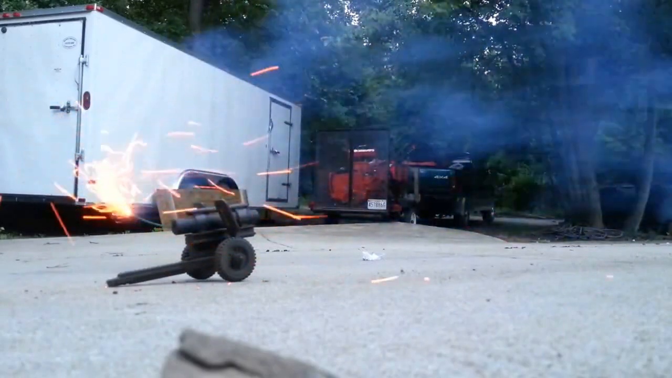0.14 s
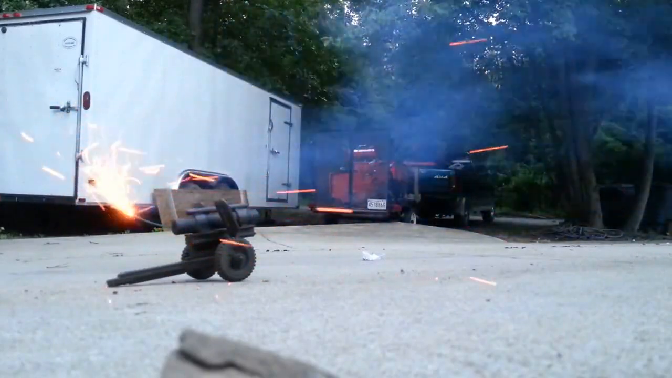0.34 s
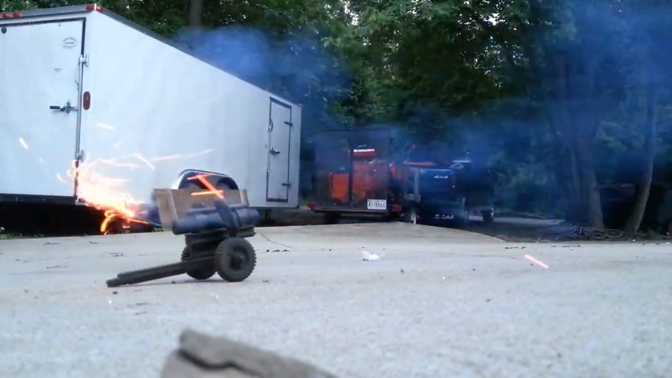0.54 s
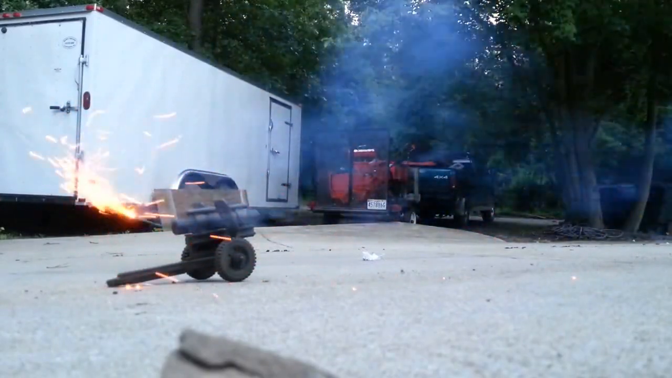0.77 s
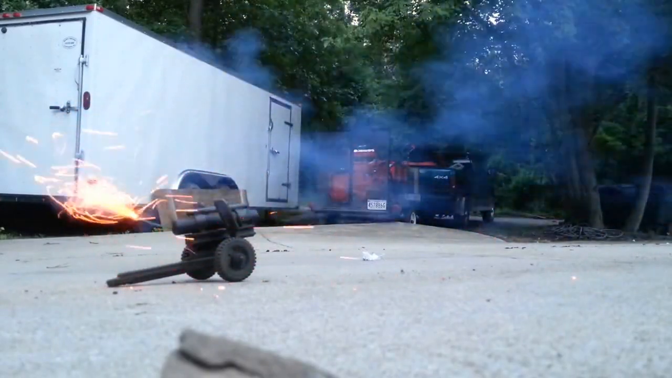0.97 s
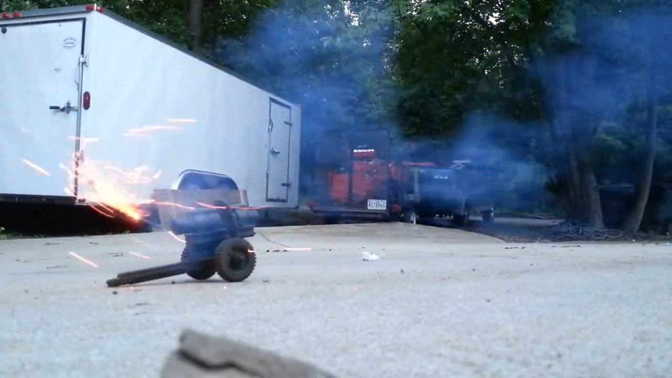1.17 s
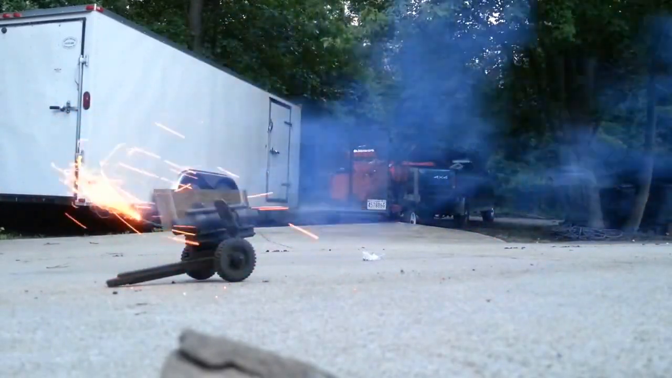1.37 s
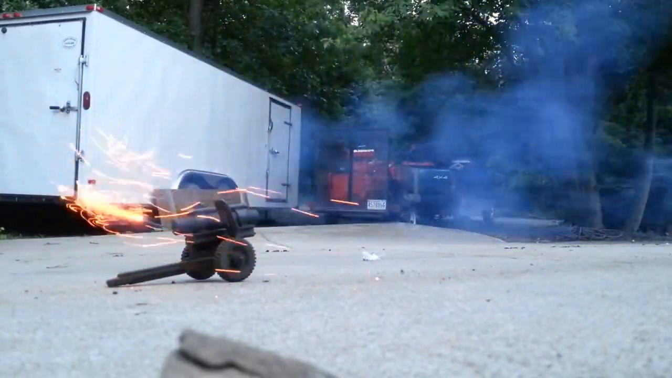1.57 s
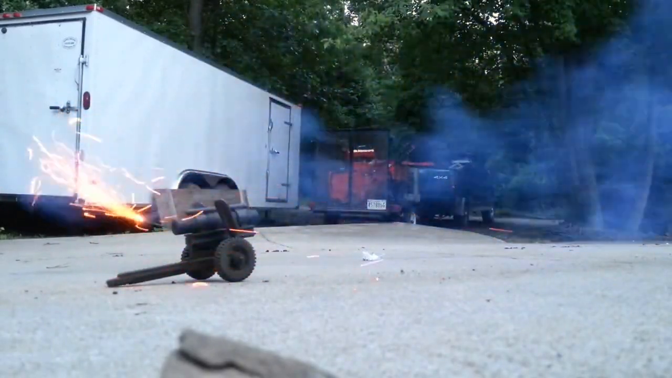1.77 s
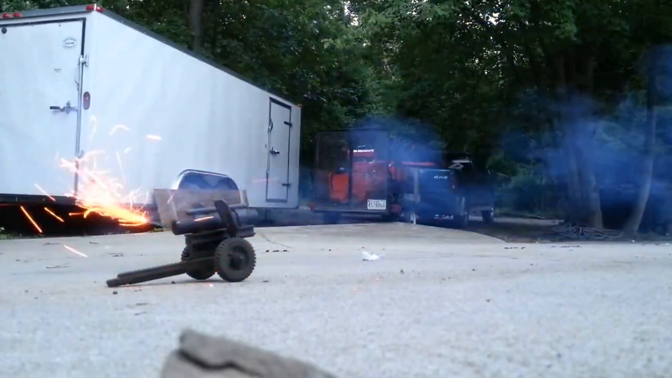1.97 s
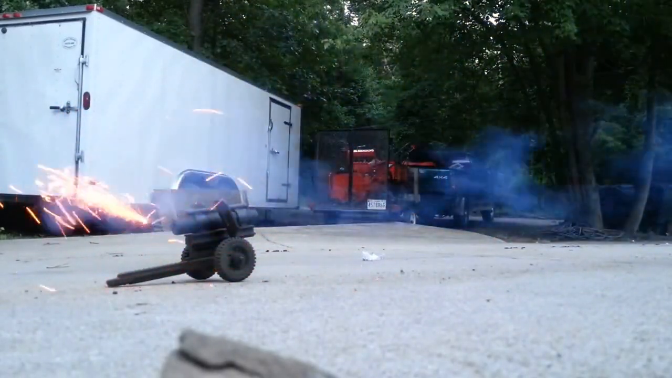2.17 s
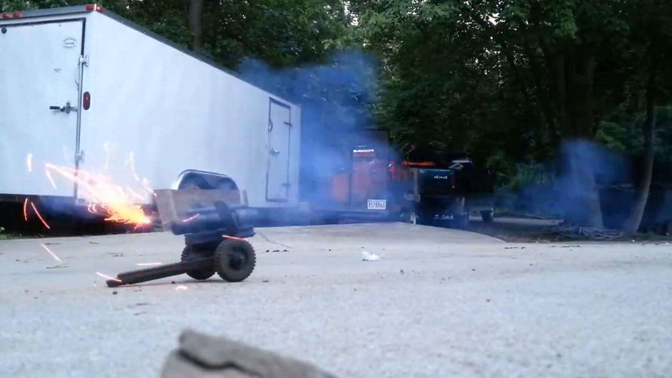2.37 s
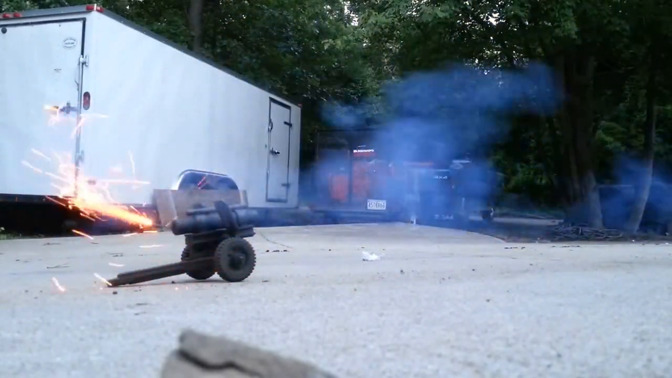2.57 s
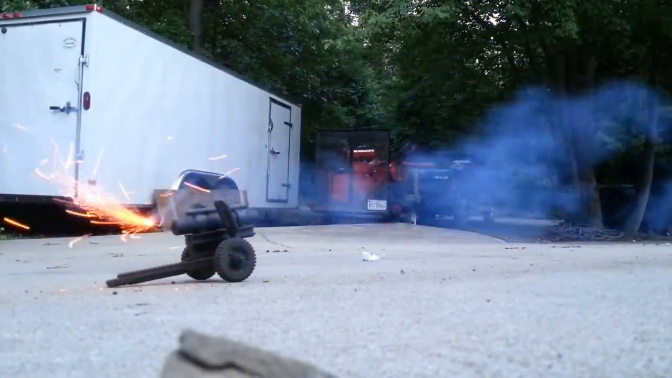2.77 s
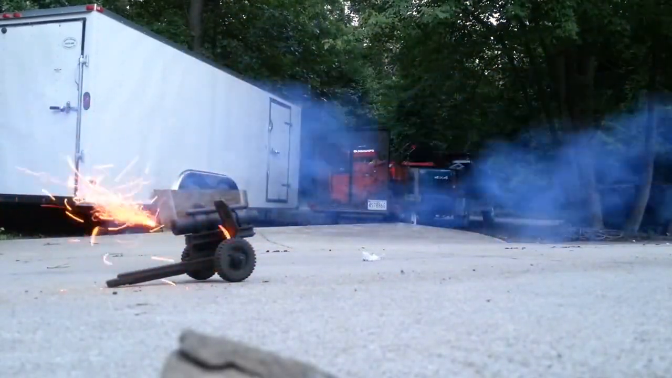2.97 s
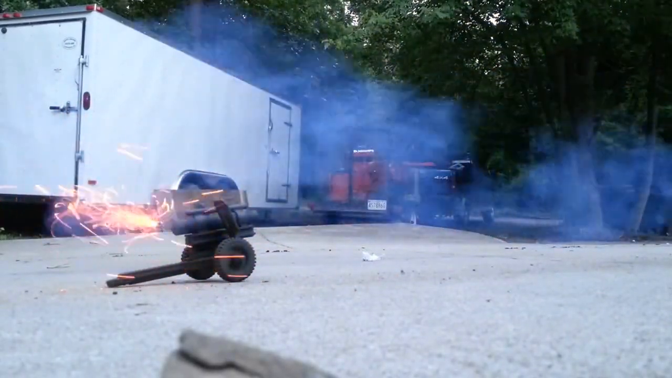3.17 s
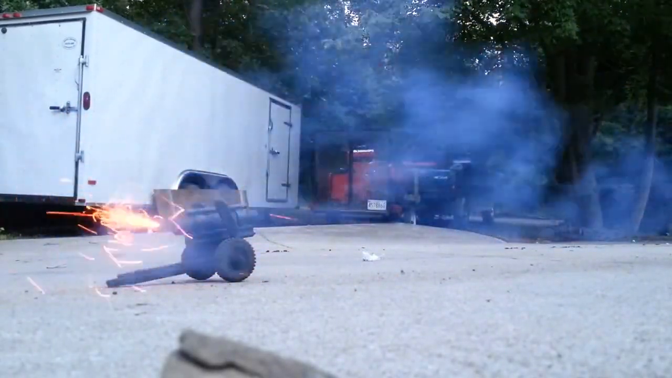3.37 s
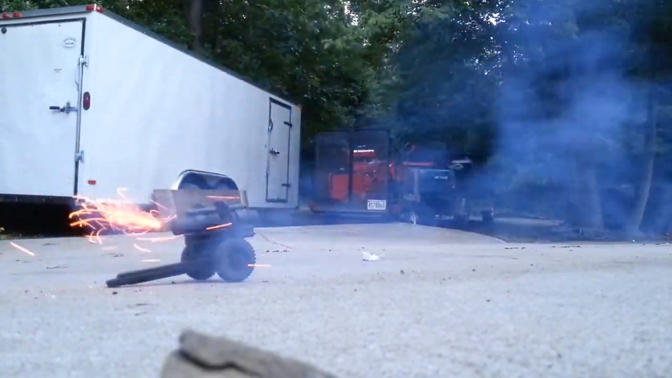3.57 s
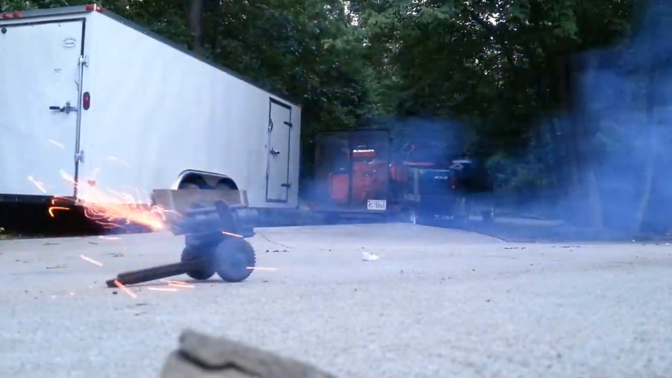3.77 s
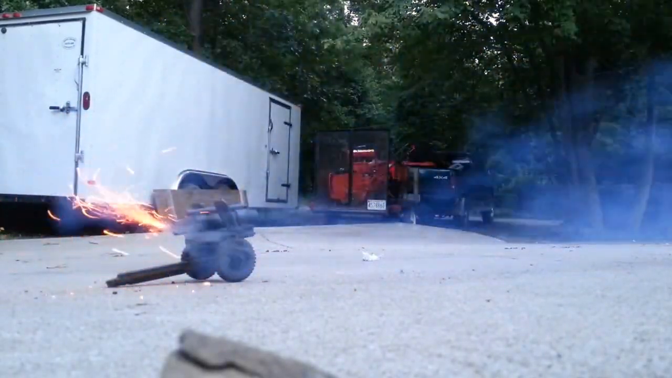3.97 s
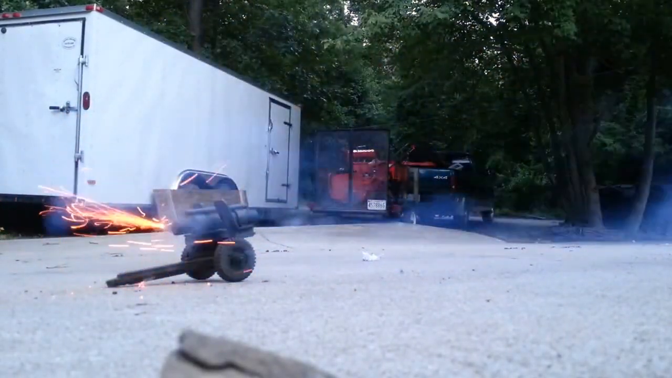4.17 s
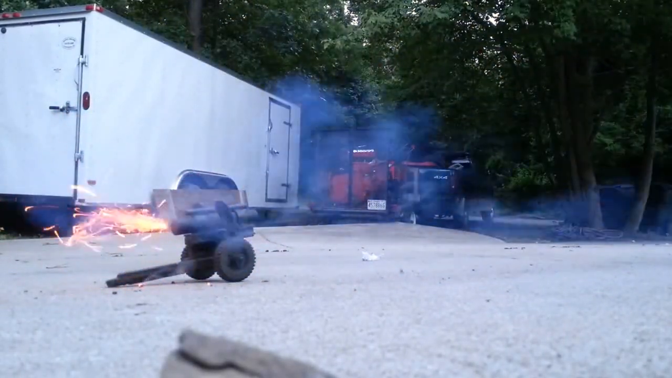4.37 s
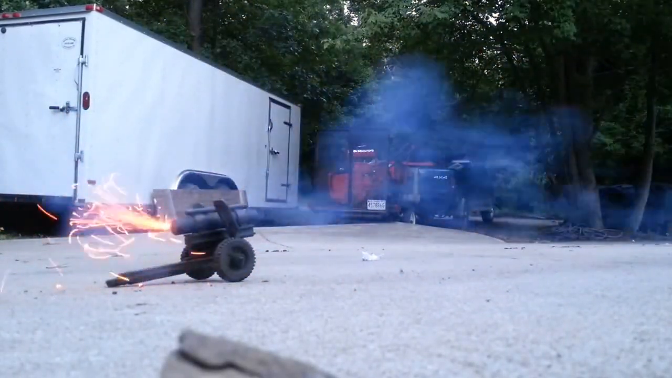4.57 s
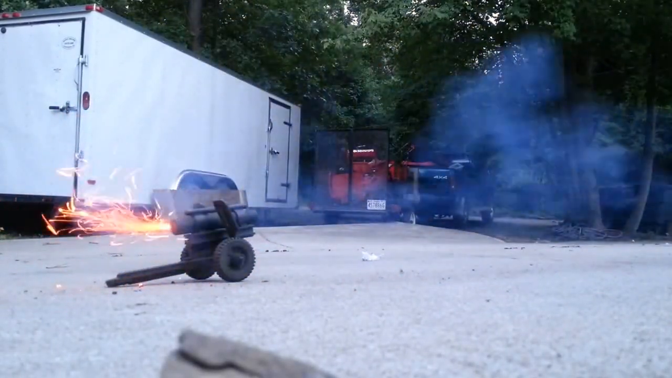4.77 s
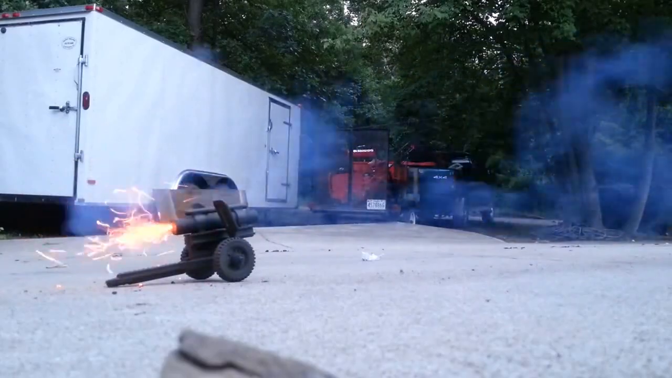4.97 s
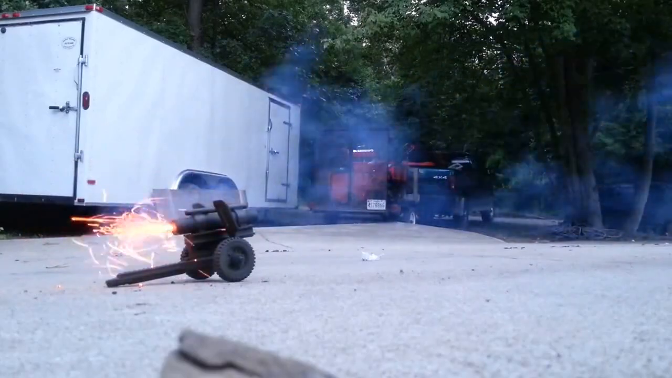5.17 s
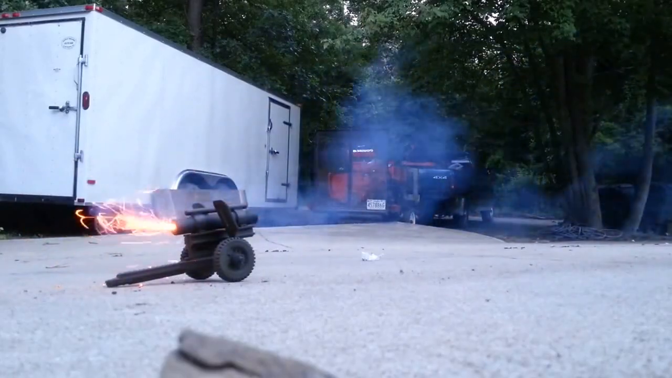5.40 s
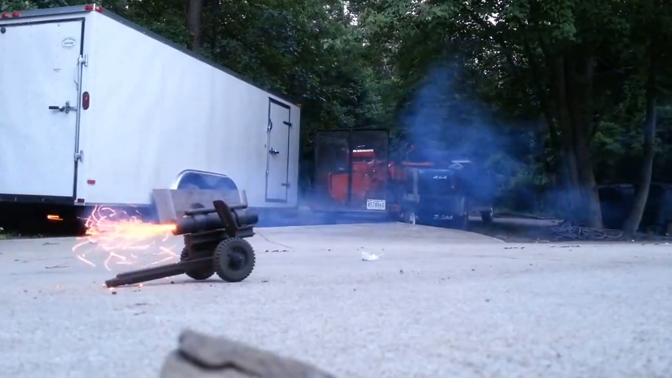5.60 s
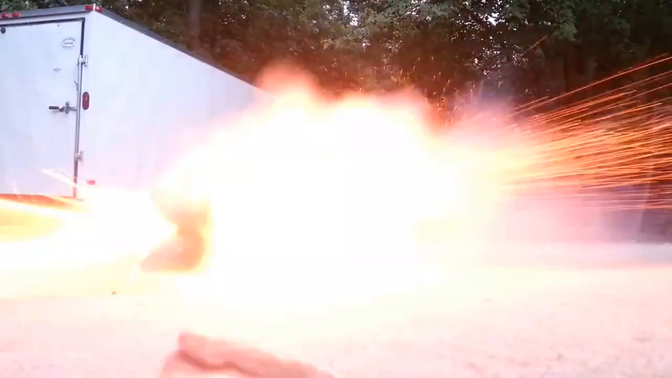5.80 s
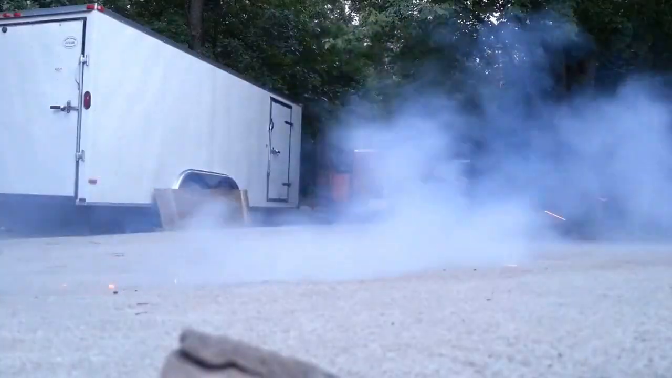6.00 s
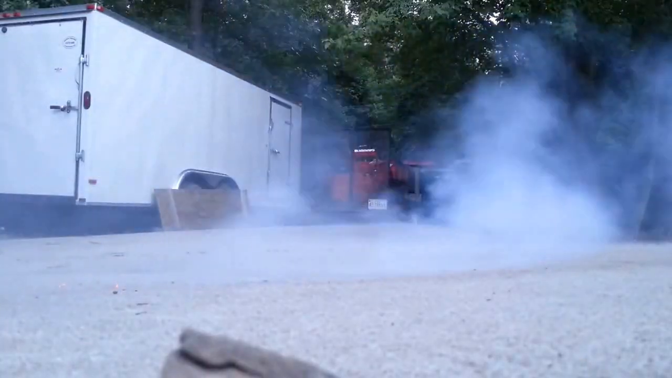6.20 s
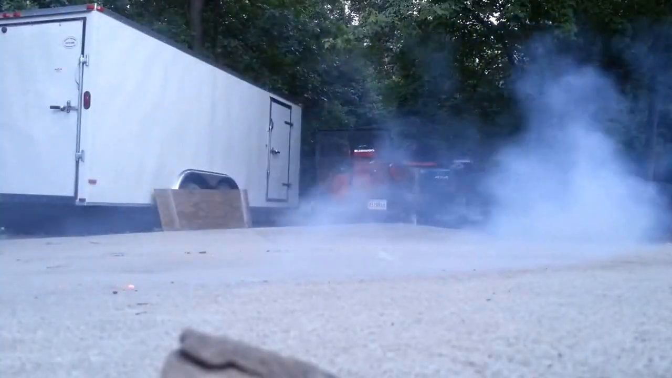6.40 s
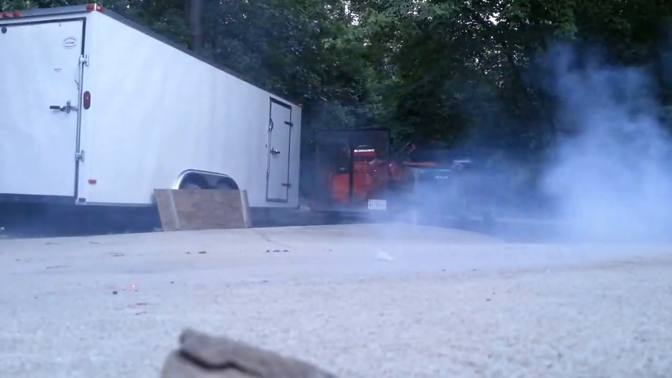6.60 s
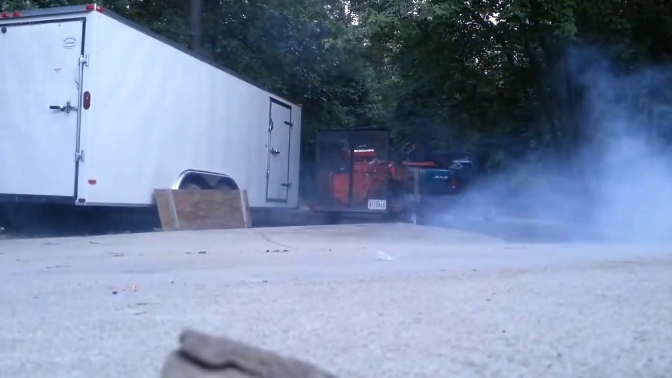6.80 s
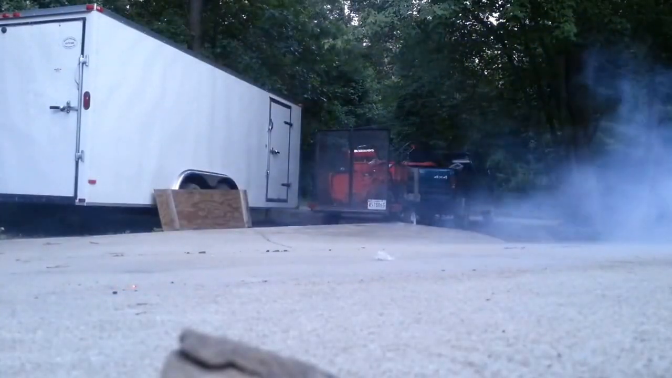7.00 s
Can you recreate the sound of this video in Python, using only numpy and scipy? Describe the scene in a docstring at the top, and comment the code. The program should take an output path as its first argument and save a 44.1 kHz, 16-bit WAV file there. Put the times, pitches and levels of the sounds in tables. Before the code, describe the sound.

Outdoors in a gravel yard surrounded by trees, with close stereo microphones. From 0 to 5.77 s a fuse burns with a continuous bright, sputtering hiss, its level fluttering quickly and its treble growing crisper toward the end. Far traffic rumbles very faintly underneath, and at about 3 to 4.8 s a distant engine drones by, gliding down in pitch, barely audible. From about 4.8 s, low wind buffets thump on the microphones, with a brief pop at 5.1 s. At 5.77 s the hiss swells into a flash of roar and at 5.8 s a small cannon fires: one huge, sharp, clipped bang with a heavy boom. Lumpy echoes come back from trees and walls, losing treble and fading until 7 s, with a thuddy slap near 6.3 s. Grit lands with dry, short, ringing clicks at about 5.95, 6.3 and 6.37 s, and a louder, clattering cluster at 6.72 to 6.75 s toward the left.

```python
"""Gravel yard ringed by trees: a fuse burns down to the vent of a small cannon.
Far traffic, a passing drone, hiss and port wind are filtered noise and a gliding sine; the fuse is
a sputtering noise jet. The vent flare and ever duller echoes are lumpy noise, the muzzle blast N-shaped
pulses that overload the microphones, the landing grit noise cracks with short ringing modes."""
import sys
import numpy as np
from scipy import signal
from scipy.fft import rfft, irfft
from scipy.io import wavfile
from scipy.ndimage import map_coordinates

SR = 44100
rng = np.random.default_rng(int(sys.argv[2]) if len(sys.argv) > 2 else 0)


def transcribe(u):
    """Save the signal u as a 16-bit wav file named by the first command-line argument.

    u: samples, shape (n,) or (channels, n), limited to [-1, 1]; the rate is SR.
    q: integer samples, one column per channel.
    """
    v = np.clip(np.atleast_2d(u).T, -1, 1)
    q = np.round(v * 32767).astype(np.int16)
    wavfile.write(sys.argv[1], SR, q)


N = 310905
T_S = np.arange(N) / SR
HZ = np.maximum(np.arange(N // 2 + 1) * SR / N, 1)


def from_db(db):
    """Amplitude gain of a level in dB."""
    return 10 ** (np.asarray(db) / 20)


def rms_one(x):
    """Scale to rms 1."""
    return x / np.sqrt(np.mean(x ** 2) + 1e-20)


def in_time(rows):
    """Columns of a time table, interpolated to one value a sample."""
    s, *columns = np.transpose(rows)
    return [np.interp(T_S, s, column) for column in columns]


def at_hz(rows, hz=HZ):
    """Columns of a spectrum table, interpolated over log frequency."""
    f, *columns = np.transpose(rows)
    return [np.interp(np.log(hz), np.log(f), column) for column in columns]


def drift(rate_hz):
    """Slow random signal of spread 1: noise through two equal poles at rate_hz."""
    step = 40  # samples between slow values
    r = np.exp(-2 * np.pi * rate_hz * step / SR)
    white = rng.standard_normal(N // step + 2002)
    slow = signal.lfilter([1], [1, -2 * r, r * r], white)[2000:]  # drop the run-in
    return np.interp(np.arange(N) / step, np.arange(len(slow)), rms_one(slow))


def ring(clicks, hz, t60_s):
    """Two-pole resonator: a unit click starts a decaying sine of height 1."""
    r, w = from_db(-60 / (t60_s * SR)), 2 * np.pi * hz / SR
    return signal.lfilter([0, np.sin(w)], [1, -2 * r * np.cos(w), r * r], clicks + 1e-18)


def noise_pair(left_db, right_db, alike, lead_rad=0):
    """Left and right noise spectra of given colour, likeness and left phase lead; joint rms 1."""
    mid, side = rfft(rng.standard_normal((2, N)))
    alike = np.clip(alike, 0, 1)
    shared, own = np.sqrt(1 + alike) * mid, np.sqrt(1 - alike) * side
    left = shared + own
    right = (shared - own) * np.exp(-1j * lead_rad)
    pair = np.array([left * from_db(left_db), right * from_db(right_db)])
    return pair * N / np.sqrt(np.sum(np.abs(pair) ** 2))


def bands(pair, centres_hz):
    """Split a pair into overlapping bands that add up to the whole."""
    for k, hz in enumerate(centres_hz):
        share = np.interp(np.log(HZ), np.log(centres_hz), np.arange(len(centres_hz)) == k)
        yield hz, irfft(pair * share, N)


# far traffic rumble: [t/s, level/dB]
RUMBLE_LEVEL = [(0, -45), (1.0, -44), (1.7, -49), (2.3, -44), (3.2, -47), (4.2, -43.5), (5.0, -48),
                (7.05, -45)]
# rumble spectrum, relative: [f/Hz, density/dB per Hz]
RUMBLE_COLOUR = [(18, -56), (30, -35), (54, -32), (75, -6), (130, -1.5), (211, 0), (250, -5.5),
                 (613, -13.5), (900, -14), (1170, -29), (1980, -120)]
# far engine droning past: [t/s, f/Hz, level/dB]
DRONE_GLIDE = [(2.9, 156, -80), (3.3, 150, -48), (3.8, 135, -46), (4.3, 122, -46), (4.5, 118, -52),
               (4.9, 112, -80)]
# yard hiss spectrum, relative: [f/Hz, density/dB per Hz]
HISS_COLOUR = [(500, 7), (1300, 0), (2200, -25), (5000, -2), (15000, -6.5)]
HISS_DB = -55


def surroundings():
    """Far traffic as near-mono low noise, an engine as a wavering gliding sine, faint wide hiss."""
    rumble_db, hiss_db = at_hz(RUMBLE_COLOUR)[0], at_hz(HISS_COLOUR)[0]
    rumble = from_db(in_time(RUMBLE_LEVEL)[0]) * irfft(noise_pair(rumble_db, rumble_db, 0.95), N)
    drone_hz, drone_db = in_time(DRONE_GLIDE)
    drone = from_db(drone_db + 1.3 * drift(5.3)) * np.sin(2 * np.pi * np.cumsum(drone_hz) / SR)
    hiss = from_db(HISS_DB) * irfft(noise_pair(hiss_db, hiss_db, 0.14), N)
    return rumble + drone + hiss


# wind spectrum, relative: [f/Hz, density/dB per Hz]
WIND_COLOUR = [(20, -22), (50, -3.5), (120, 3), (200, 0), (320, -14), (600, -47)]
# wind on both ports, before lumps: [t/s, level/dB]
BREEZE_LEVEL = [(0, -62.5), (4.6, -55), (4.84, -43), (5.5, -43), (6.4, -47), (6.7, -40), (7.05, -39.5)]
# buffets on one port, before lumps: [t/s, peak/dB, 1/e half length/s, port]
PORT_BUFFETS = [(4.908, -41, 0.026, "left"), (4.97, -38, .06, "right"), (5.066, -33, 0.022, "left"),
                (5.192, -33, 0.04, "right"), (5.29, -29, 0.052, "left"), (5.34, -32.5, 0.037, "right"),
                (5.43, -36, 0.054, "right"), (5.662, -30, 0.02, "left"), (5.71, -50, 0.037, "right"),
                (6.553, -37, 0.031, "left"), (6.603, -40, .06, "right"), (6.77, -39, .04, "right"),
                (6.83, -39, 0.03, "right"), (6.914, -32.5, 0.021, "left"), (7.03, -39, .015, "left")]
# swirl popping on the left port: [t/s, peak/dB, length/s]
SWIRL_POP = (5.1155, -14, .0045)


def buffet_gain(side):
    """Sum of bell-shaped swells on one port."""
    return sum(from_db(peak_db) * np.exp(-((T_S - s) / half_s) ** 2)
               for s, peak_db, half_s, port in PORT_BUFFETS if port == side)


def wind():
    """Lumpy low noise own to each port, swelling in buffets; one pop is a single push and pull."""
    colour_db = at_hz(WIND_COLOUR)[0]
    lumps = from_db(0.97 * np.array([drift(10.0), drift(18)]))
    buffets = np.array([buffet_gain("left"), buffet_gain("right")])
    strength = from_db(in_time(BREEZE_LEVEL)) + buffets
    gusts = strength * lumps * irfft(noise_pair(colour_db, colour_db, 0), N)
    pop_s, peak_db, length_s = SWIRL_POP
    cycle = np.clip((T_S - pop_s) / length_s, 0, 1)
    gusts[0] += from_db(peak_db) * np.sin(2 * np.pi * cycle)
    return gusts


# grit landings: [t/s, reference peak/dB, left-right/dB, skid/s, favoured ring f/Hz]
LANDINGS = [(5.9543, -10, -1.5, 0, 7200), (6.3022, -13.5, 4, .0015, 3600), (6.3660, -19.5, 3, 0, 3600),
            (6.3712, -23, 3, 0, 3600), (6.5282, -36, 0, 0, 7900), (6.7192, -12.5, 7, .007, 3300),
            (6.7362, -24, 7, 0, 2950), (6.7376, -7, 9, 0, 2800), (6.7425, -25, 7, 0, 2950),
            (6.7441, -12, 7, 0, 2950), (6.7488, -21, 6, 0, 2950), (6.7528, -20, 6, 0, 2950)]
# spacing of a skidding grain's touches, loss per touch
SKID_TOUCH_S, SKID_LOSS_DB = .0015, 1.5


def touches():
    """Landings plus the weakening, unevenly spaced touches of grains that skid."""
    uneven = rng.uniform(-.3, .3, (len(LANDINGS), 8))
    rows = []
    for row, (s, peak_db, pan_db, skid_s, ring_hz) in enumerate(LANDINGS):
        for k in range(8):
            if k * SKID_TOUCH_S <= skid_s:
                at_s = s + SKID_TOUCH_S * (k + (k > 0) * uneven[row, k])
                rows.append((at_s, peak_db - SKID_LOSS_DB * k, pan_db, ring_hz))
    return rows


# ringing modes, level relative to the touch: [f/Hz, level/dB, t60/s]
RING_MODES = [(2500, -12, .008), (2950, -8, .007), (3600, -8, .007), (4400, -13, .004), (5800, -9, .005),
              (6800, -8, .006), (7900, -12, .005)]
# crack spectrum, relative: [f/Hz, density/dB per Hz]
CRACK_SPECTRUM = [(1200, -21), (2500, 11), (7500, -17), (9300, -19), (11500, -13), (15000, -12)]
CRACK_DB, CRACK_T60_S = -10.5, 0.008
FAVOUR_DB, FAVOUR_OCTAVES = 7, .17  # boost of modes near the favoured pitch over far ones; width
GRIT_RIGHT_LATE_S = .00032  # grit lands to the left


def grit():
    """Each touch is a dry broad crack and strikes shared short modes with strengths of its own."""
    s, peak_db, pan_db, favoured_hz = np.transpose(touches())
    at = (s * SR).astype(int)
    sides_db = peak_db + np.outer([.5, -.5], pan_db)
    spread_db = rng.normal(0, 0.81, (len(s), len(RING_MODES)))
    hits = np.zeros((2, N))
    hits[:, at] = from_db(sides_db + CRACK_DB)
    dying = signal.lfilter([1], [1, -from_db(-60 / (CRACK_T60_S * SR))], hits + 1e-18)
    colour_db = at_hz(CRACK_SPECTRUM)[0]
    out = dying * irfft(noise_pair(colour_db, colour_db, 0.25), N)
    for k, (hz, level_db, t60_s) in enumerate(RING_MODES):
        near = np.exp(-(np.log2(hz / favoured_hz) / FAVOUR_OCTAVES) ** 2) - .5
        mode_db = sides_db + level_db + FAVOUR_DB * near + spread_db[:, k]
        hits[:, at] = from_db(mode_db) * (-1) ** k  # neighbouring modes start opposed
        out += ring(hits, hz, t60_s)
    return np.array([out[0], np.roll(out[1], int(GRIT_RIGHT_LATE_S * SR))])


# fuse jet, bright core before JET_GAIN_DB and random swings: [t/s, level/dB]
FUSE_LEVEL = [(0.0, -34.5), (0.11, -34), (0.24, -32.5), (0.27, -34.5), (0.56, -36), (0.91, -30.5),
              (0.99, -35.5), (1.36, -33), (1.39, -34.5), (1.44, -31.5), (1.51, -36.5), (1.59, -29),
              (1.67, -36.5), (1.76, -31), (1.82, -35.5), (3.0, -33), (3.13, -32.5), (3.3, -37),
              (3.48, -33.5), (3.62, -36.5), (3.72, -33), (3.79, -37), (3.95, -31.5), (3.96, -34.5),
              (4.2, -33), (4.27, -39), (4.33, -32.5), (4.4, -32.5), (4.43, -34.5), (4.75, -34.5),
              (4.8, -32), (4.83, -34.5), (5.2, -33), (5.28, -37), (5.5, -34.5), (5.76, -34)]
# jet treble and its ground echo: [t/s, treble over jet/dB, notch f/Hz, echo share/0-1]
FUSE_TREBLE = [(0, -9.5, 9700, 0.9), (1.4, -6, 11000, 0.5), (1.7, -3, 12400, 0.54), (2.6, -2.5, 12800, 0),
               (3.6, -1.5, 12500, 0), (4.3, -2.5, 13890, 0.33), (5.0, 3.5, 14400, 0.03),
               (5.77, 6, 14330, 0)]
# jet spectrum, relative: [f/Hz, left/dB per Hz, right/dB per Hz, likeness/0-1, left lead/rad]
JET_COLOUR = [(60, -27.5, -36, .7, .05), (185, -9.5, -9.5, 0.68, .2), (490, -5.5, -6.5, 0.97, 0.8),
              (976, -4, -4.5, 0.89, 1.35), (1650, -6, -7.5, 0.67, 1.61), (2670, -2, -3.5, 0.89, 2.51),
              (2866, -4.5, -4.5, 0.99, 2.72), (3370, -5.5, -7, 1, 3.5), (3555, -2.5, -4, .9, 3.66),
              (4180, -1.5, -5.5, 0.61, 3.5), (5730, -4, -9.5, 1, 5.47), (7300, 0.5, -14.5, 0.4, 5.8),
              (8180, -2, -12.5, 0.9, 6.7), (10250, -11, -15, 0, 8), (12500, -5.5, -11, 0.3, 9.3),
              (14800, -15.5, -13, 0.2, 11.4)]
# burning point wanders, mostly toward the middle, then back a little:
# [t/s, right-port lag/samples, 1 is taken off]
WANDER_LAG = [(0, 1.7), (2.5, 1.25), (4.5, 0.47), (5.77, 0.9)]
FUSE_OUT_S = 5.772  # swallowed by the vent
JET_GAIN_DB, SURGE_DB = 6, 0.5  # whole jet over its core; random surges
LOWS_FOLLOW, LOWS_EDGE_HZ, TREBLE_EDGE_HZ = 0.3, 2000, 9300  # lows take only this share of swings
FLICKER_SAMPLES = 0.21  # the flame dances: port lag wavers


def fuse():
    """A sputtering gas jet; its treble meets a ground echo whose notch mostly climbs as the flame sinks."""
    level_db, = in_time(FUSE_LEVEL)
    treble_db, notch_hz, echo = in_time(FUSE_TREBLE)
    swing_db = level_db - level_db.mean() + 0.45 * drift(24) + SURGE_DB * drift(19.0)
    body, treble = 0, 0
    for hz, band in bands(noise_pair(*at_hz(JET_COLOUR)), [300, 700, 1500, 3000, 6000, 8800, 9800, 13000]):
        follows = LOWS_FOLLOW if hz < LOWS_EDGE_HZ else 1
        band = band * from_db(follows * swing_db + 1.27 * drift(26))
        if hz > TREBLE_EDGE_HZ:
            treble = treble + band
        else:
            body = body + band
    echo_at = np.arange(N) - 1.5 * SR / notch_hz  # 1.5 periods late: cancels at notch_hz
    echoed = np.array([map_coordinates(side, [echo_at], order=3) for side in treble])
    treble = from_db(treble_db) * (treble + np.clip(echo, 0, 1) * echoed)
    burning = np.arange(N) < FUSE_OUT_S * SR
    jet = burning * from_db(level_db.mean() + JET_GAIN_DB) * (body + treble)
    right_at = np.arange(N) + 1 - in_time(WANDER_LAG)[0] + FLICKER_SAMPLES * drift(12.0)
    return np.array([jet[0], map_coordinates(jet[1], [right_at], order=3)])


# the muzzle points right: flare, echo envelope reach the left port later
LEFT_LATE_S = 0.0012
# roar spectrum, relative: [f/Hz, density/dB per Hz]
ROAR_SPECTRUM = [(40, -25), (100, -20), (180, -8.5), (280, -0.5), (450, 3), (800, -2.5), (1500, -6),
                 (3000, -10), (7500, -15.5), (10000, -19), (13000, -23.5), (15000, -26)]
# left-right likeness of the roar: [f/Hz, likeness/0-1]
ROAR_ALIKE = [(60, .4), (130, 0.82), (250, 0.99), (640, 0.51), (1400, 0.01), (15000, 0.0088)]
# treble lost on the way, below zero where the sound is bright (vent flare, early echoes):
# [t/s, loss at 1 kHz/dB]
TREBLE_LOSS = [(5.766, -3), (5.797, -1.9), (5.804, 0.17), (5.92, -0.45), (6.1, 1.34), (6.3, 3.5), (6.42, 4),
               (6.55, 5), (6.8, 6), (7.05, 6)]
# second spit of flame after the snuffing: [t/s, level/dB]
SECOND_SPIT = [(5.8008, -12), (5.8013, 3), (5.8022, 1), (5.803, -15)]
# echoes from trees and walls: [t/s, level/dB, boom of far walls over it/dB]
ECHO_LEVEL = [(5.81, 0, 9), (5.845, 5, -4.5), (5.866, -3, 3.5), (5.88, -1.5, 7), (5.9, -7.5, 1),
              (5.94, -8.5, 2), (5.97, -10, -0.5), (6.0, -9, 0), (6.03, -9, -2.5), (6.07, -8, 1),
              (6.095, -8, 2.5), (6.13, -9.5, 1), (6.17, -11, -3), (6.205, -9.5, 2.5), (6.25, -11, -0.5),
              (6.29, -11.5, -6), (6.35, -15, -1), (6.42, -18.5, 0), (6.47, -19.5, -1), (6.54, -20.5, 2),
              (6.6, -22, -1.5), (6.65, -24.5, 2), (6.7, -24, 1), (6.77, -24.5, -1.5), (6.85, -28, -0.5),
              (7.05, -34.5, -2.5)]
# the flare swells steadily, is snuffed within SWITCH_S, then dies on until the first echoes
FLARE_START_S, FLARE_END_S, FLARE_START_DB, FLARE_END_DB = 5.766, 5.7965, -43, 20
SNUFFED_DB, LULL_DB, LULL_END_S, SWITCH_S = -10, -19, 5.809, .0012
BOOM_EDGE_HZ, BRIGHT_PEAK_HZ = 400, 7500  # boom lies below; brightness stops rising above
LOSS_POWER = 0.88  # loss grows a little slower than frequency
ECHO_LEFT_LATE_S, ECHO_LEFT_TREBLE_DB = .00017, 2  # echoes come a little from the right; left brighter


def roar():
    """Vent flare and echoes from trees and walls: lumpy noise losing treble with distance travelled."""
    flare = [(FLARE_START_S, FLARE_START_DB), (FLARE_END_S, FLARE_END_DB),
             (FLARE_END_S + SWITCH_S, SNUFFED_DB), *SECOND_SPIT, (LULL_END_S, LULL_DB)]
    level_db, boom_db = in_time([(s, db, 0) for s, db in flare] + list(ECHO_LEVEL))
    loss_db, = in_time(TREBLE_LOSS)
    colour_db, alike = at_hz(ROAR_SPECTRUM)[0], at_hz(ROAR_ALIKE)[0]
    level_db = np.array([np.roll(level_db, int(LEFT_LATE_S * SR)), level_db])
    left_db = colour_db + 0.62 + ECHO_LEFT_TREBLE_DB * np.clip(HZ / 8000, 0, 1) ** 2
    pair = noise_pair(left_db, colour_db - .6, alike, -2 * np.pi * HZ * ECHO_LEFT_LATE_S)
    out, lumps = 0, drift(30)
    for hz, band in bands(pair, [100, 200, 320, 520, 1000, 1700, 2600, 4000, 6000, 9000, 13000]):
        # single trunks and walls make the bass lumpy, leaves scatter the treble smooth
        lumpy_db = (1.0 * lumps + 1.4 * drift(21)) / (1 + hz / 1500)
        reach_khz = np.where(loss_db < 0, min(hz, BRIGHT_PEAK_HZ), hz) / 1000
        lost_db = loss_db * reach_khz ** LOSS_POWER
        out = out + band * from_db(level_db - lost_db + lumpy_db + boom_db * (hz < BOOM_EDGE_HZ))
    return out * (np.arange(N) > FLARE_START_S * SR)


# blast and slap echoes, peak before rounding: [t at right port/s, peak/dB, length/s, low-pass f/Hz,
# sign (+1 push first, -1 suction first), left-right/dB, left-port delay/s]
PRESSURE_FRONTS = [(5.7974, 0, .0036, 2000, 1, 9, .0011), (5.8011, 2, .0024, 2500, 1, -3, .0009),
                   (5.8022, 4, .0070, 700, -1, 0, .0008), (5.8178, 6, .0037, 900, 1, -1, .0011),
                   (6.2866, -7, .0021, 1000, -1, 4, .0003), (6.543, -24, .007, 250, 1, 1, .0003),
                   (6.6672, -17, .0014, 900, 1, 1, .0003), (6.6683, -14, .0021, 900, -1, 2, .0003)]


def blast():
    """Each front is an N-shaped pulse (jump, slide through zero, jump back) rounded by a low-pass."""
    out = np.zeros((2, N))
    for s, peak_db, length_s, sharp_hz, sign, pan_db, left_late_s in PRESSURE_FRONTS:
        phase = (T_S - s - np.array([[left_late_s], [0]])) / length_s
        height = np.sign(sign) * from_db(peak_db + pan_db * np.array([[.5], [-.5]]))
        pulse = height * (1 - 2 * phase) * (phase > 0) * (phase < 1)
        rounding = signal.butter(2, sharp_hz, fs=SR, output="sos")
        out += signal.sosfilt(rounding, pulse + 1e-18)
    return out


def scene():
    """Sum of all sources at the two ports."""
    return surroundings() + wind() + grit() + fuse() + roar() + blast()


LOW_CUT_HZ, COUPLING_HZ, CUTOFF_HZ = 40, 28, 14550  # capsules, after the overload, top
CEILING = .93  # overload limit


def record(dry):
    """Capsules lose deep bass, the input overloads with nearly flat tops, coupling and top cut follow."""
    capsule = signal.butter(2, LOW_CUT_HZ, "high", fs=SR, output="sos")
    coupling = signal.butter(2, COUPLING_HZ, "high", fs=SR, output="sos")
    top_cut = signal.ellip(12, .3, 80, CUTOFF_HZ, fs=SR, output="sos")
    thin = signal.sosfilt(capsule, dry)
    overloaded = thin / (1 + np.abs(thin / CEILING) ** 6) ** (1 / 6)
    coupled = signal.sosfilt(coupling, overloaded)
    return np.clip(signal.sosfilt(top_cut, coupled), -1, 1)


dry = scene()
out = record(dry)
transcribe(out)
```